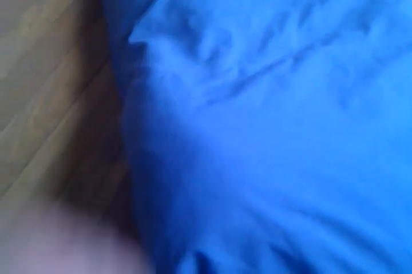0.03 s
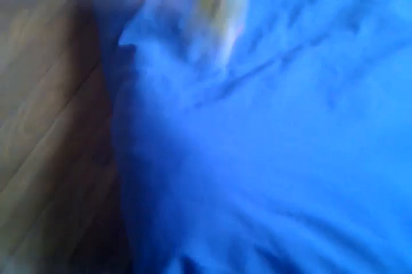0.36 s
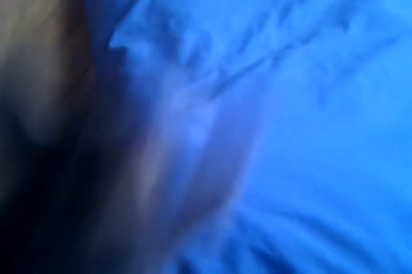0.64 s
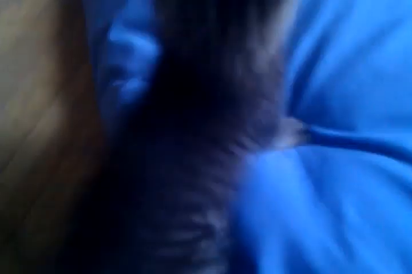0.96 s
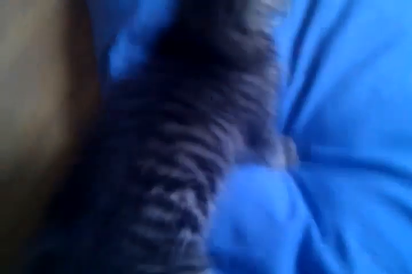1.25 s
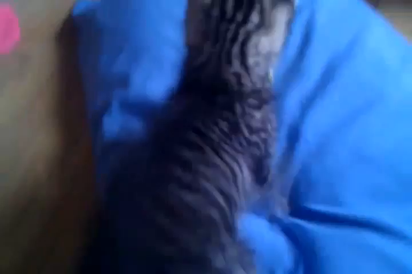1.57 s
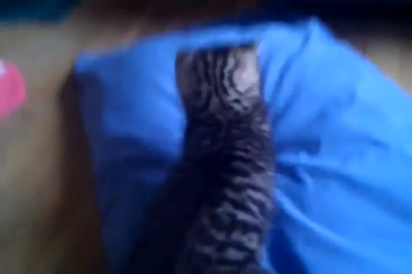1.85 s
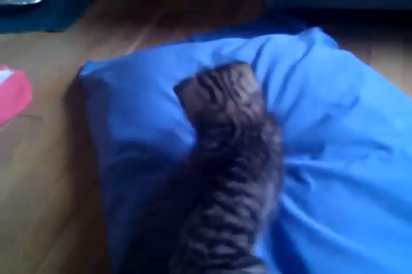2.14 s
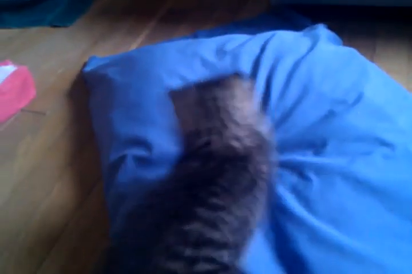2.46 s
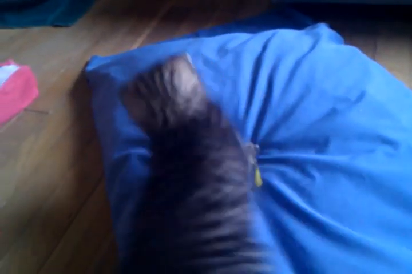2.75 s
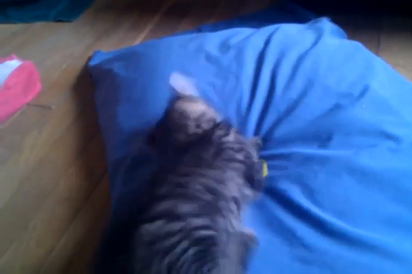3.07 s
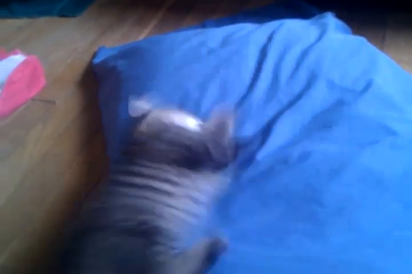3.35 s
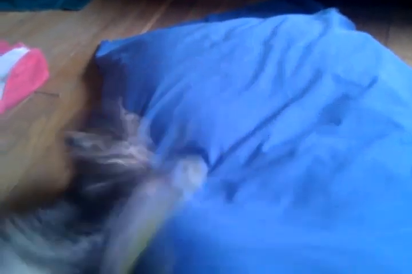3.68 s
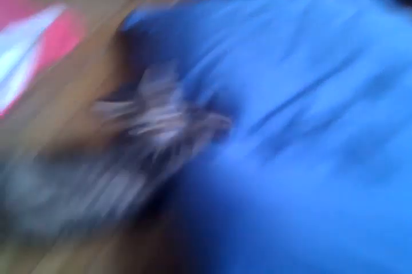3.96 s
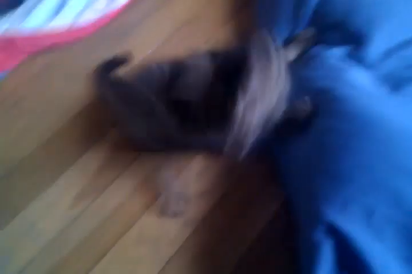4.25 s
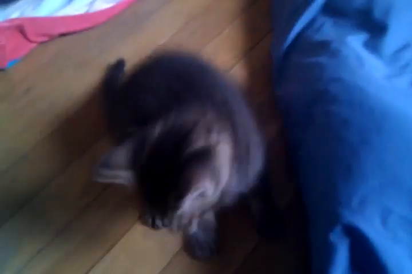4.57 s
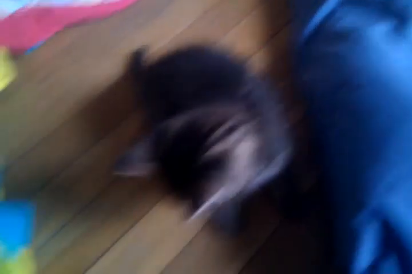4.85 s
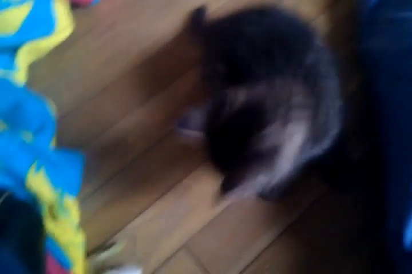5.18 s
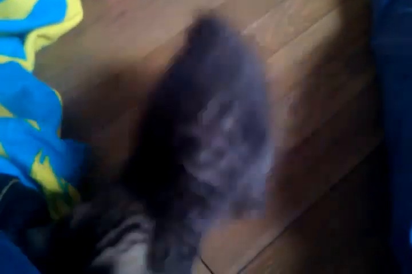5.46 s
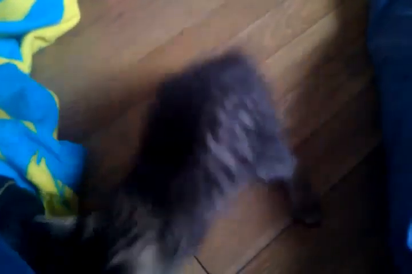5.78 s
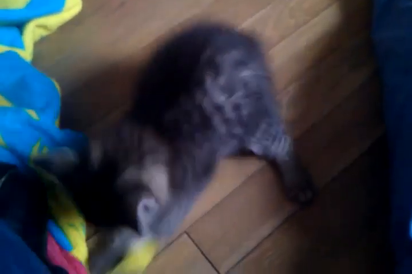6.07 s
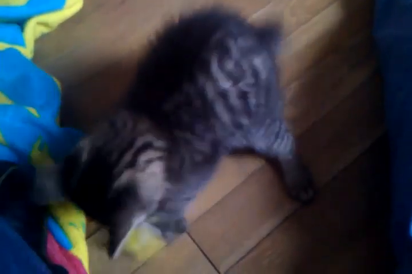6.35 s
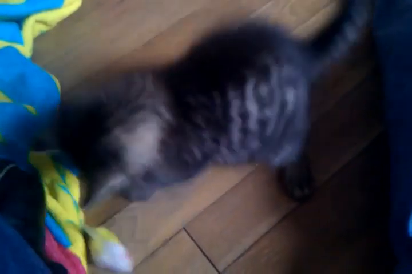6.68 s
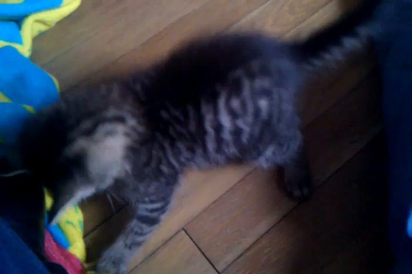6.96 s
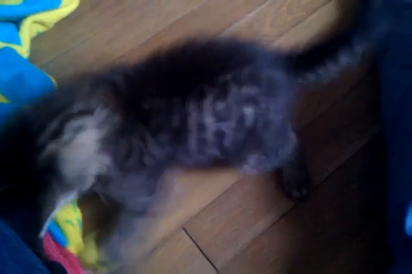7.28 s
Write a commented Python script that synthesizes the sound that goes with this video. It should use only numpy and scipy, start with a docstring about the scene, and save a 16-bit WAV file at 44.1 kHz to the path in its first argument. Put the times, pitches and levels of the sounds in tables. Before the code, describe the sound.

A kitten plays in a small furnished room, heard close through a phone microphone with little treble and steady hiss. Two light knocks on wood come at 0.2 and 0.6 seconds. From 0.7 seconds paws pat and brush a cushion, with the firmest muffled thud at 1 second. Claws pluck the fabric in small, crackly snaps, sharpest around 1.6 to 1.9 seconds, then weaker until 2.8. After a short lull, a cloth swish and more sharp snags come at 3.4 seconds. From 3.6 to 4.4 seconds kitten and toy hit the floorboards with about four loud, short, hollow knocks, the hardest slightly distorted, with brief rustles between them. A light tap follows at 4.6 seconds, then only hiss. From 5.4 seconds there are scattered soft taps and faint rustles, with clearer knocks near 5.9 and 6.9 seconds. Hiss remains until the end.

```python
"""A kitten chases a small toy in a small room, heard by a close, narrow-band phone over steady hiss.
Two light knocks on wood come first. From 0.7 s paws pat and brush a cushion and claws pluck its weave.
From 3.6 s kitten and toy ring the floorboards; the hardest knocks overload the phone.
Lighter knocks and a little rustling follow until 7 s."""
import sys
import numpy as np
from scipy import signal
from scipy.fft import rfft, irfft, next_fast_len
from scipy.io import wavfile

SR = 44100
rng = np.random.default_rng(int(sys.argv[2]) if len(sys.argv) > 2 else 0)


def transcribe(u):
    """Save the signal u as a 16-bit wav file named by the first command-line argument.

    u: samples, shape (n,) or (channels, n), limited to [-1, 1]; the rate is SR.
    q: integer samples, one column per channel.
    """
    v = np.clip(np.atleast_2d(u).T, -1, 1)
    q = np.round(v * 32767).astype(np.int16)
    wavfile.write(sys.argv[1], SR, q)


N = 327422
TIME = np.arange(N) / SR
AGE = np.arange(SR // 2) / SR  # s since a blow

# cloth noise spectrum: f/Hz, level/dB
CLOTH = [(40, -1), (130, 5.5), (210, 2), (500, 7), (1000, 3.5), (2000, -1.5), (3200, -8.5), (5000, -9)]


def amp(db):
    """Decibels to gain."""
    return 10 ** (np.asarray(db) / 20)


def unit(x):
    """Scale to rms 1."""
    return x / np.sqrt(np.mean(x ** 2))


def peaked(x):
    """Scale to peak 1."""
    return x / np.abs(x).max()


def fade(t60_s):
    """Exponential decay after a blow."""
    return np.exp(-np.log(1000) * AGE / t60_s)


def colour(x, points):
    """Filter by (f/Hz, gain/dB) points joined on a log-frequency axis."""
    hz, db = np.transpose(points)
    size = next_fast_len(len(x) + SR // 10)
    bin_hz = np.maximum(np.fft.rfftfreq(size, 1 / SR), 1)
    gain = amp(np.interp(np.log(bin_hz), np.log(hz), db))
    return irfft(rfft(x, size) * gain, size)[:len(x)]


def resonate(x, hz, q):
    """One damped resonance, gain 1 at its centre."""
    return signal.lfilter(*signal.iirpeak(min(hz, SR / 4), max(q, 0.3), fs=SR), x)


def add(track, start_s, sound):
    """Mix a sound into the track."""
    i = int(start_s * SR)
    track[i:i + len(sound)] += sound[:N - i]


def snap(hz, cycles):
    """Heavily damped sine, 60 dB down after the given cycles."""
    return peaked(np.sin(2 * np.pi * hz * AGE) * fade(max(cycles, 1) / hz))


def push(hz, cycles):
    """Contact force building up over the given cycles."""
    return 1 - np.exp(-(AGE * hz / cycles) ** 2)


def air(hiss_db=-41.5, waver_db=1.5, stir_db=-49, stir_swing_db=3):
    """Steady hiss with a low drone; the cushion stirs faintly while the kitten is on it."""
    def waver(count):
        """Random points joined by straight lines."""
        return np.interp(TIME, np.linspace(0, TIME[-1], count), rng.standard_normal(count))
    # room noise spectrum: f/Hz, level/dB
    spectrum = [(30, 2.5), (60, -7.5), (170, -9), (205, 0), (250, -2.5), (400, -5.5), (700, -8),
                (1200, -11.5), (1450, -9), (1900, -15), (3200, -19), (5000, -20)]
    hiss = unit(colour(rng.standard_normal(N), spectrum)) * amp(hiss_db + waver_db * waver(150))
    stir = unit(colour(rng.standard_normal(N), CLOTH)) * amp(stir_db + stir_swing_db * waver(220))
    on_cushion = np.interp(TIME, [0.15, 0.7, 3.5, 4.5], [0, 1, 1, 0])
    return hiss + on_cushion * stir


def room(x, wet_db=-19, gap_s=0.0026, t60_s=0.3):
    """Weak, short reflections of a furnished room."""
    onset = np.clip(AGE / gap_s - 1, 0, 1)
    tail = rng.standard_normal(len(AGE)) * fade(t60_s) * onset
    return x + amp(wet_db) * signal.fftconvolve(x, tail / np.linalg.norm(tail))[:N]


def strokes(slips_per_s=1800, spread_db=4, slip_share=0.83, rise_share=0.47,
            fast_rub_db=7, slow_rub_db=6, slow_rub_hz=674):
    """Paw and fur slide on cloth, and the toy slides on after some landings, in tiny slips over fine hiss;
    speed sets level and pitch of the rub."""
    def rub(cloth, hz):
        """Band that the sliding cloth favours, more focused at higher pitch."""
        q = 1.3 * np.sqrt(hz / 1000)
        return resonate(resonate(cloth, hz, q)[::-1], hz, q)[::-1]  # both ways: zero phase
    # strokes and slides: peak t/s, length/s, level/dB, full-speed rub f/Hz; the 4.022, 4.245 and 6.879 rows are
    # the toy sliding on after landing
    swipes = [(0.769, 0.035, -32, 804), (0.846, 0.19, -34.5, 327), (.948, .042, -27, 755),
              (0.996, 0.078, -23.5, 1930), (1.106, 0.1, -29.5, 598), (1.345, 0.053, -31, 1000),
              (1.593, 0.14, -37.5, 1770), (1.719, 0.017, -28, 1780), (1.777, 0.054, -27.5, 1710),
              (2.307, 0.22, -42.5, 1000), (2.534, 0.026, -25.5, 1520), (2.58, 0.057, -29, 1420),
              (2.799, .09, -36, 596), (2.87, 0.072, -37, 1830), (3.431, 0.063, -23, 820),
              (3.486, 0.046, -30, 895), (3.524, 0.052, -26.5, 2230), (4.022, 0.08, -29, 1310),
              (4.245, 0.049, -25.5, 685), (5.674, 0.14, -42.5, 1250), (6.379, 0.016, -38, 1980),
              (6.879, 0.049, -38.5, 740)]
    out = np.zeros(N)
    t = np.arange(-SR // 3, SR // 3) / SR
    for peak_s, length_s, db, hz in swipes:
        sizes = amp(spread_db * np.minimum(rng.exponential(size=len(t)), 3))
        signs = rng.choice([-1, 1], len(t))
        slips = unit(sizes * signs * (rng.random(len(t)) < slips_per_s / SR))
        hiss = rng.standard_normal(len(t))
        cloth = colour(np.sqrt(slip_share) * slips + np.sqrt(1 - slip_share) * hiss, CLOTH)
        width_s = length_s * np.where(t < 0, rise_share, 1 - rise_share)
        speed = np.exp(-(t / width_s) ** 2)
        fast = unit(cloth + amp(fast_rub_db) * rub(cloth, hz))
        slow = unit(cloth + amp(slow_rub_db) * rub(cloth, min(hz, slow_rub_hz)))
        add(out, peak_s + t[0], amp(db) * speed * (speed * fast + (1 - speed) * slow))
    return out


def plucks(mean_gap_s=0.016, scatter_db=13, range_hz=(870, 2100), max_count=24):
    """Threads slip off a claw in uneven runs; yields t/s, level/dB, f/Hz."""
    # bouts of clawing: start t/s, length/s, typical level/dB
    bouts = [(1.165, .055, -33), (1.583, .045, -21.5), (1.724, .045, -31), (1.848, .06, -31.5),
             (2.034, .115, -32.5), (2.206, .18, -36), (2.768, .025, -22), (5.635, .08, -36)]
    for start_s, length_s, db in bouts:
        for k, (late, strength, pitch) in enumerate(rng.random((max_count, 3))):
            age_s = (k + late) * mean_gap_s
            if age_s < length_s:
                pluck_db = db + scatter_db * (2 * strength - 1)
                yield start_s + age_s, pluck_db, np.interp(pitch, [0, 1], range_hz)


def snags(thread_hz=1900, cover_hz=520, cover_db=-9, fibres_db=-19, fibres_t60_s=0.04):
    """A thread snaps off a claw, the cover twitches and loose fibres crackle."""
    # single hard catches of a claw: t/s, level/dB, f/Hz
    catches = [(.8475, -23.5, 980), (1.154, -24.5, 1870), (1.202, -24, 1100), (1.346, -22, 1690),
               (1.659, -11, 1784), (1.707, -8.5, 1194), (1.7758, -15.5, 1900), (1.819, -17.5, 1980),
               (1.855, -19, 2000), (2.036, -19.5, 890), (2.136, -22.5, 1860), (2.191, -20.5, 1750),
               (2.374, -25, 2010), (2.525, -21, 1100), (3.403, -20.5, 1000), (3.421, -12.5, 917),
               (3.437, -11.5, 1510), (5.432, -26.5, 890)]
    out = np.zeros(N)
    for start_s, db, hz in [*catches, *plucks()]:
        thread = peaked(resonate(snap(hz, cycles=5.7), thread_hz, q=1.4))
        twitch = snap(cover_hz, cycles=9.5)
        fibres = unit(resonate(rng.standard_normal(len(AGE)), thread_hz, q=0.47)) * fade(fibres_t60_s)
        add(out, start_s, amp(db) * (thread + amp(cover_db) * twitch + amp(fibres_db) * fibres))
    return out


def pats(slap_db=-11, slap_ratio=1.3, crush_db=-18, crush_t60_s=0.085,
         sink_hz=230, sink_db=-13, sink_delay_s=0.0043):
    """Stuffing damps a paw's thud; the cover slaps and crumples, then the whole cushion gives."""
    # paw landings: t/s, level/dB, thud f/Hz
    landings = [(0.7245, -20.5, 460), (0.8066, -19, 388), (0.8467, -17.5, 271), (1.008, -17, 800),
                (1.0201, -6.5, 650), (1.091, -9.5, 512), (1.097, -17.5, 282), (1.537, -22, 437),
                (1.7706, -24, 246), (1.797, -20.5, 478), (2.337, -24.5, 640), (2.779, -26.5, 600),
                (2.822, -28.5, 550), (3.712, -25, 577)]
    out = np.zeros(N)
    for start_s, db, hz in landings:
        slap = amp(slap_db) * snap(slap_ratio * hz, cycles=5)
        thud = peaked(push(hz, cycles=0.57) * (snap(hz, cycles=5) + slap))
        crush = unit(colour(rng.standard_normal(len(AGE)), CLOTH)) * fade(crush_t60_s)
        add(out, start_s, amp(db) * (thud + amp(crush_db) * crush))
        add(out, start_s + sink_delay_s, amp(db + sink_db) * snap(sink_hz, cycles=7))
    return out


def blows(settle_s=0.0165, settle_db=-19, settle_hardness=0.2, settle_ring=2.3):
    """Each floor impact, then a weak second touch as the weight settles and the boards ring on."""
    # floor impacts: t/s, level/dB, centre f/Hz, hardness (0 paw pad, 1 toy), ring time factor
    impacts = [(0.217, -23.5, 400, 0.5, 0.56), (0.5703, -19, 640, 0.33, 0.27), (3.569, 0.5, 402, .2, 0.69),
               (3.858, 2, 490.5, 0.54, 1.18), (3.8666, -4.5, 604, 1, 0.69), (3.9932, -5, 966, .8, 0.55),
               (4.2026, -15.5, 288, 0.86, .3), (4.3428, -2.5, 334, 0.06, 0.67), (4.563, -22, 467, .7, 0.49),
               (5.405, -28.5, 270, 0.3, 0.2), (5.661, -28, 402, 0.4, 0.23), (5.782, -22, 329, 0, 0.68),
               (5.8733, -13.5, 750, .75, 0.14), (6.397, -29.5, 423, .75, 0.87), (6.499, -27, 334, 0, 0.55),
               (6.8578, -19, 805, 1, .5)]
    for start_s, db, hz, hardness, ring in impacts:
        yield start_s, db, hz, hardness, ring
        yield start_s + settle_s, db + settle_db, hz, settle_hardness, ring * settle_ring


def knocks(dense_db=-14, dense_t60_s=0.25, dense_q=3.3, overtone_ratio=1.86,
           tick_hz=1850, scrape_db=-12, scrape_t60_s=0.054, low_cut_hz=89.3):
    """Each blow rings the board modes near its centre frequency; claw or toy ticks at the contact."""
    # floorboard modes: f/Hz, level/dB, t60/s
    modes = [(195, -5.5, .14), (300.5, 2.5, 0.11), (351, -6.5, 0.2), (391, 2.5, 0.14), (428.5, -11.5, 0.24),
             (476, -12, 0.11), (511.7, 2.5, .14), (603, -21.5, 0.24), (655.3, -7.5, 0.26),
             (740, -19.5, 0.22), (770, 0, 0.089), (805, -7, 0.2), (950, -15, 0.08), (898, -1.5, 0.15),
             (1074, 12, 0.042), (1190, 9, 0.053), (1297, -5, 0.21), (1398, -15.5, .13), (1420, 1, 0.25),
             (1970, -12, .1)]
    mode_hz, mode_db, mode_t60_s = np.transpose(modes)
    out = np.zeros(N)
    for start_s, db, hz, hardness, ring in blows():
        # harder contact: more modes, louder tick, shorter push
        spread_octaves = np.interp(hardness, [0, 1], [0.019, 0.63])
        tick_db = np.interp(hardness, [0, 1], [-19, -7.5])
        force = push(hz, cycles=np.interp(hardness, [0, 1], [1.206, 0.33]))
        gains = amp(mode_db) / (1 + (np.log2(mode_hz / hz) / spread_octaves) ** 2)
        board = sum(gain * np.sin(2 * np.pi * f * AGE) * fade(t60_s * ring)
                    for f, gain, t60_s in zip(mode_hz, gains, mode_t60_s))
        # neighbouring boards and loose joints: dense, toneless ring
        joints = resonate(rng.standard_normal(len(AGE)), hz, dense_q)
        dense = unit(resonate(joints, overtone_ratio * hz, dense_q)) * fade(dense_t60_s * ring)
        scrape = unit(resonate(rng.standard_normal(len(AGE)), tick_hz, q=1)) * fade(scrape_t60_s)
        tick = snap(tick_hz, cycles=11) + amp(scrape_db) * scrape
        knock = peaked(force * board) + amp(dense_db) * force * dense + amp(tick_db) * tick
        add(out, start_s, amp(db) * knock)
    radiation = signal.butter(1, low_cut_hz, "high", fs=SR, output="sos")  # boards radiate little bass
    return signal.sosfilt(radiation, out)


def scene():
    """Kitten, cushion and floor in the room, mono."""
    return (air() + room(knocks() + pats() + strokes() + snags()))[None]


def record(dry, top_hz=16500):
    """The phone keeps a narrow band; the hardest knocks clip and splutter above it."""
    # microphone response: f/Hz, gain/dB
    response = [(30, -28), (70, -7), (160, -7.5), (200, 2.5), (1200, 1), (1450, -3), (1900, 2.5), (2500, 2),
                (3200, 3.5), (3500, -4), (3850, -16), (4700, -20.5), (5200, -39), (5700, -90)]
    clipped = np.clip(colour(dry[0], response), -1, 1)
    low_pass = signal.ellip(8, 0.2, 70, top_hz, fs=SR, output="sos")
    return signal.sosfilt(low_pass, clipped)[None]


dry = scene()
out = record(dry)
transcribe(out)
```